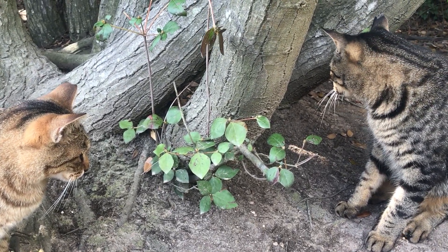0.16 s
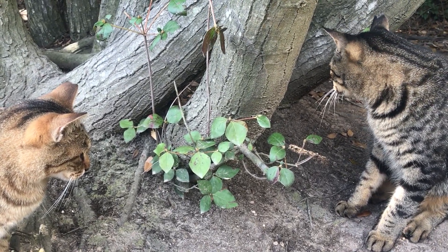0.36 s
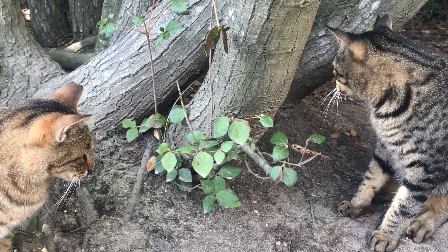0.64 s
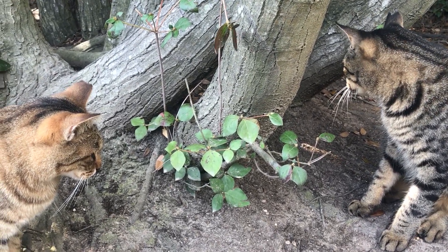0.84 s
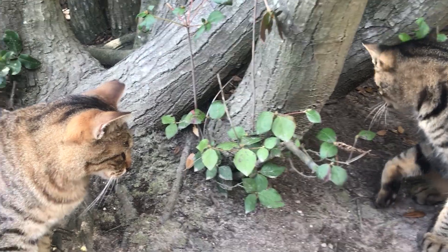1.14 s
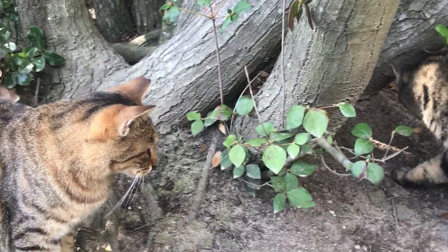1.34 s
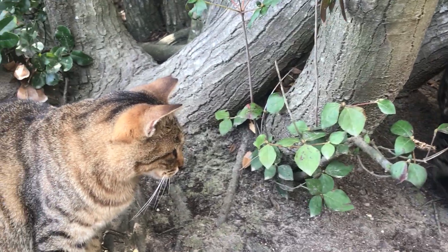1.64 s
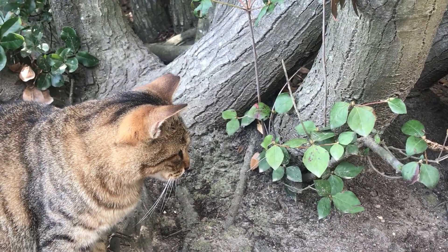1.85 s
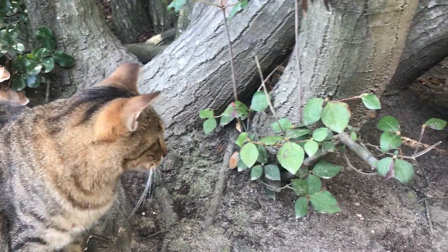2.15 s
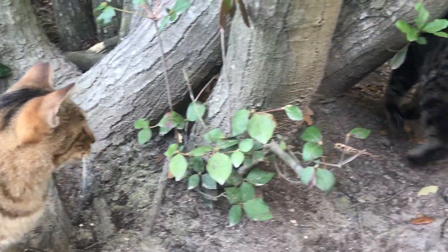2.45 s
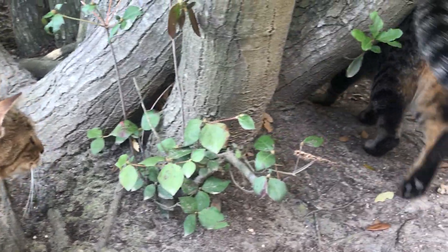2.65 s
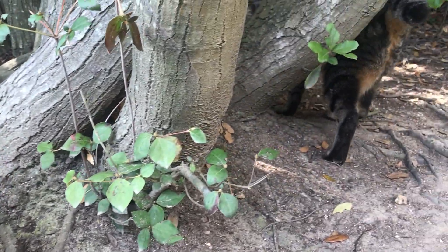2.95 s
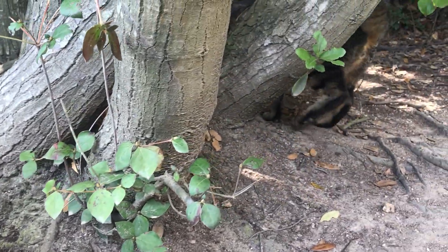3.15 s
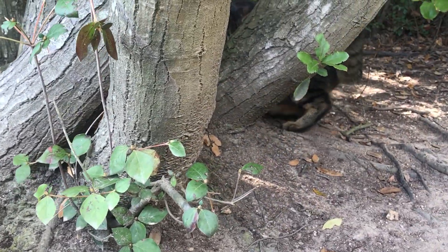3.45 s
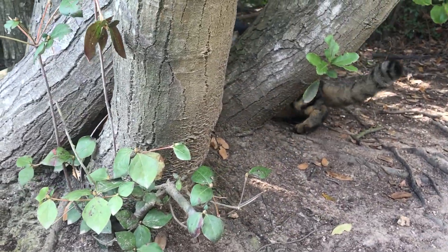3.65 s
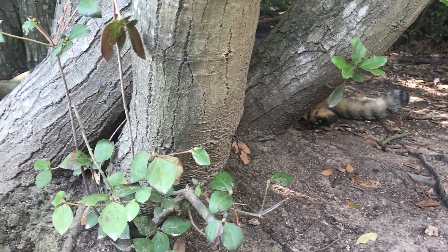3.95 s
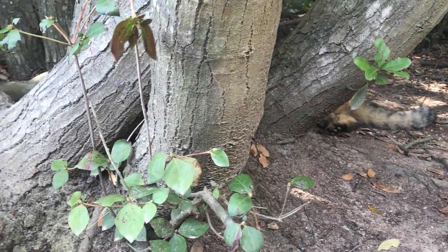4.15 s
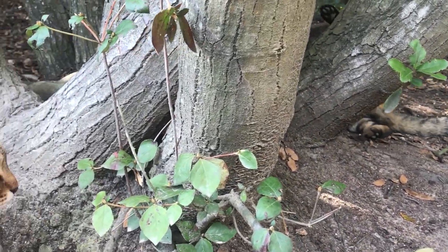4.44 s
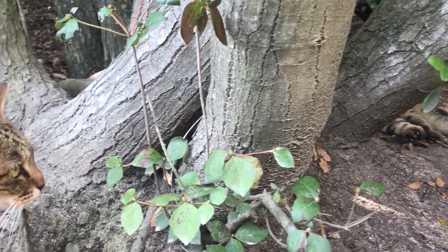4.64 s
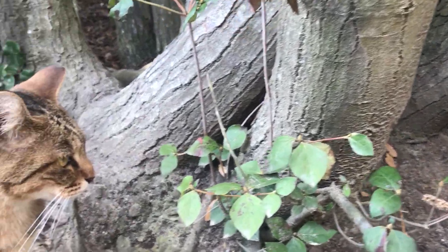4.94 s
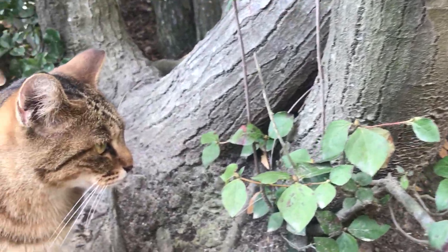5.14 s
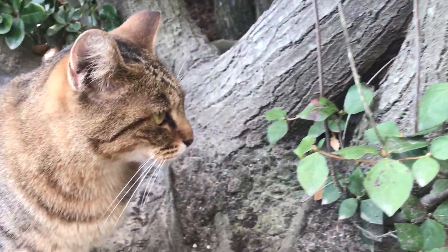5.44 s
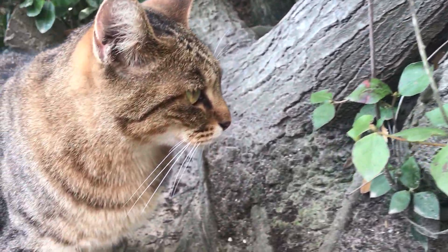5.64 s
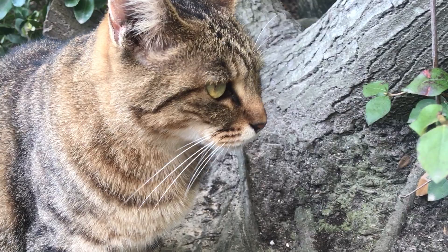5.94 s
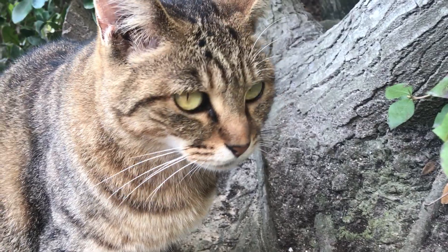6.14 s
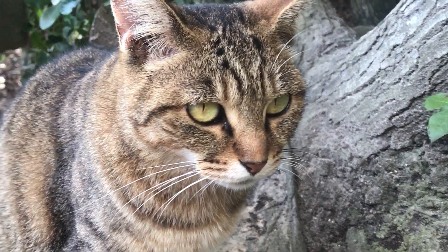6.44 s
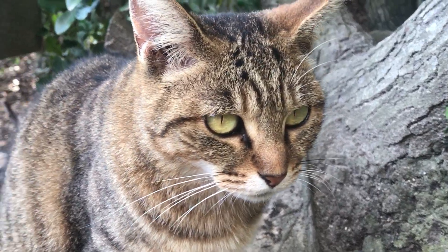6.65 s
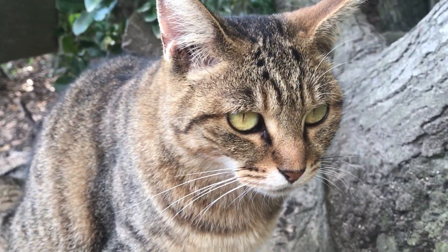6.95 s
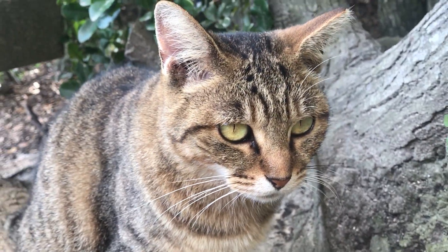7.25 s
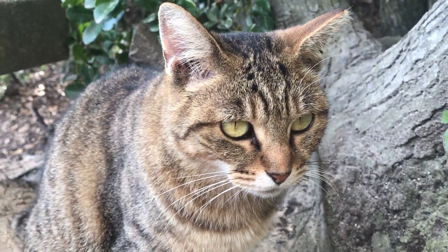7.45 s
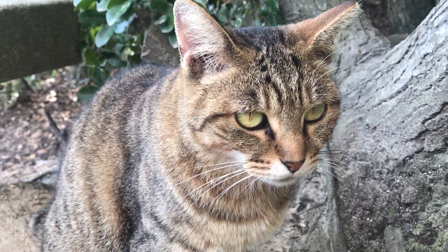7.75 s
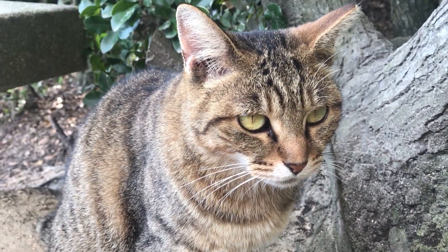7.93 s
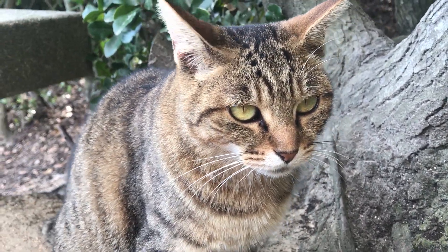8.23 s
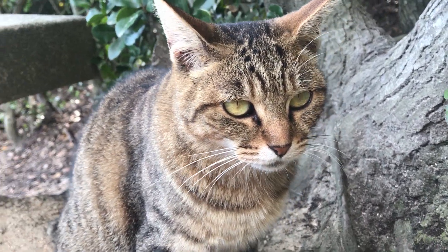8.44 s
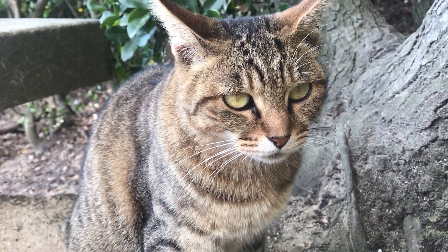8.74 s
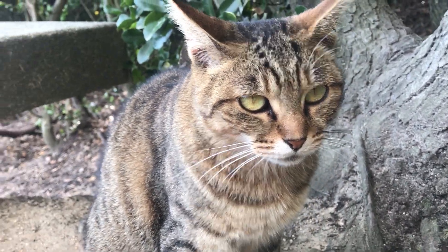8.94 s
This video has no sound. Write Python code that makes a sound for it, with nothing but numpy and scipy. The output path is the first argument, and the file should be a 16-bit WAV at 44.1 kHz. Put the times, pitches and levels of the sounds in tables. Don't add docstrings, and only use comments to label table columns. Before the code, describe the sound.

A quiet wooded place, recorded with an exposed microphone: steady, very high insect rasping in short rapid strokes, blurred by echoes off trunks, with faint distant chirping behind. Early on, purer cricket trills come in three bursts. Soft low wind bumps, strongest around five and a half seconds, and sparse dry leaf ticks follow. At the very end everything breaks off into close scraping and loud hollow wood knocks.

```python
import sys
import numpy as np
from scipy import signal
from scipy.fft import rfft, irfft, next_fast_len
from scipy.io import wavfile

SR = 44100
rng = np.random.default_rng(int(sys.argv[2]) if len(sys.argv) > 2 else 0)


def elevation(decibels):
    levels = np.asarray(decibels, float)
    return 10 ** (levels / 20)


def transcribe(u):
    v = np.clip(np.atleast_2d(u).T, -1, 1)
    q = np.round(v * 32767).astype(np.int16)
    wavfile.write(sys.argv[1], SR, q)


N = 400849
TIME = np.arange(N) / SR
CUT_S = 8.852

# time_s, level_db
BREEZE_LEVEL = [(0.0, -58), (0.81, -60), (1.43, -52), (1.82, -60.5), (2.27, -51.5), (2.41, -59), (3.3, -62),
                (4.24, -61.5), (4.56, -53), (5.0, -60), (5.49, -48.5), (5.77, -56.5), (6.16, -50.5),
                (6.46, -59.5), (6.66, -63), (7.44, -55.5), (8.48, -57), (8.85, -63.5)]


def evened(x):
    return x / np.sqrt(np.mean(x ** 2) + 1e-20)


def coloured(x, points):
    size = next_fast_len(len(x))
    point_hz, point_db = np.transpose(points)
    hz = np.fft.rfftfreq(size, 1 / SR)
    gain = elevation(np.interp(np.log(hz + 1), np.log(point_hz + 1), point_db))
    return irfft(rfft(x, size) * gain, size)[:len(x)]


def coloured_noise(points):
    return evened(coloured(rng.standard_normal(N), points))


def add(mix, s, sound):
    at = round(s * SR)
    sound = sound[max(-at, 0):]
    part = mix[max(at, 0):][:len(sound)]
    part += sound[:len(part)]


def wander(hz):
    lowpass = signal.butter(2, hz, fs=SR, output="sos")
    return evened(signal.sosfilt(lowpass, rng.standard_normal(N)))


def scatter(x, t60, gap_s):
    t = np.arange(SR // 3) / SR
    taps = rng.standard_normal(len(t)) * (rng.random(len(t)) < .1)
    tail = taps * elevation(-60 * t / t60) * (1 - np.exp(-t / gap_s))
    return signal.oaconvolve(x, tail / np.linalg.norm(tail))[:len(x)]


def echoes(x, t60, wet_db, gap_s):
    return x + elevation(wet_db) * scatter(x, t60, gap_s)


def glide(hz, drop_hz, length_s):
    t = np.arange(-1.5 * length_s, 1.5 * length_s, 1 / SR)
    shape = np.exp(-(2 * t / length_s) ** 2)
    turns = hz * t - drop_hz * t ** 2 / (2 * length_s)
    return shape * np.sin(2 * np.pi * turns + 2 * np.pi * rng.random())


def strokes(stroke_s):
    # time_s, strokes_so_far
    tempo = [(-.085, 0), (1.4022, 8), (1.77, 10), (2.3115, 13), (3.0435, 17), (3.2275, 18), (3.5901, 20),
             (4.3302, 24), (4.4975, 25), (4.8581, 27), (5.3954, 30), (5.5839, 31), (6.1364, 34),
             (6.3167, 35), (6.8679, 38), (7.0474, 39), (7.4168, 41), (7.7794, 43), (8.6959, 48)]
    # from_s, to_s
    slow_spells = [
        (.2, .55),
        (.75, 1.1),
        (1.7, 2.0),
        (2.4, 4.4),
    ]
    fast_teeth_per_s, slow_teeth_per_s = 335, 303
    stumble_s, stumble_db = 4.146, -2.5
    marks_s, made = np.transpose(tempo)
    starts_s = np.interp(np.arange(made[-1] + 1), made, marks_s)
    slow = np.any([(starts_s > a) & (starts_s < b) for a, b in slow_spells], axis=0)
    db = 0.45 * rng.standard_normal(len(starts_s))
    db += stumble_db * (abs(starts_s - stumble_s) < stroke_s)
    return zip(starts_s, db, np.where(slow, slow_teeth_per_s, fast_teeth_per_s))


def bush_cricket():
    # pitch_hz, level_db, t60_s
    membrane = [
        (9700, -9, .003),
        (11000, -1.5, .0045),
        (12500, 0, .0045),
        (13600, -8, .003),
    ]
    # frequency_hz, density_db (per Hz)
    rasp_tone = [(4710, -51), (8000, -26), (8950, -13), (9310, -8.5), (9650, 0), (10300, -3), (11200, 0.5),
                 (12400, 0), (13400, -.5), (15600, -23.5)]
    stroke_s = 0.063
    lead, t = SR // 5, np.arange(300) / SR
    clicks = np.zeros(N + lead)
    for s, db, teeth_per_s in strokes(stroke_s):
        tooth_s = np.arange(0, stroke_s, 1 / teeth_per_s)
        late, uneven = rng.standard_normal((2, len(tooth_s)))
        force_db = db + 1.5 * uneven - 1.2 * (1 - tooth_s / stroke_s) ** 2
        at = np.round((s + tooth_s + .0001 * late) * SR).astype(int) + lead
        clicks[at] = elevation(force_db)
    ring = sum(elevation(db - 60 * t / t60) * np.sin(2 * np.pi * hz * t) for hz, db, t60 in membrane)
    ring = ring * (1 - np.exp(-t * SR / 9)) ** 2
    direct = signal.oaconvolve(clicks, ring)[lead:lead + N]
    turn = 2 * np.pi * 0.6 * np.arange(N + lead) / SR
    wet = sum(scatter(clicks, 0.21, gap_s=250 / SR) * np.cos(turn + k * np.pi / 3) for k in range(3))
    wet = coloured(wet, rasp_tone)[lead:]
    return elevation(-66.3) * evened(direct) + elevation(-63.3) * evened(wet)


def field_cricket():
    # first_pulse_s, last_pulse_s, pulses_per_s, final_db, echo_db
    trills = [
        (-.4895, .07, 43.2, -56, -6.5),
        (.442, 1.003, 46.15, -60, -6.5),
        (1.194, 1.775, 45.3, -60.5, -1),
    ]
    start_hz, end_hz, swell_db = 5040, 5185, 5.5
    pulse_s, pulse_growth_s = .012, .0045
    settle_hz, settle_s = 470, .006
    out = np.zeros(N)
    for first, last, rate, final_db, echo_db in trills:
        trill = np.zeros(2 * SR)
        for s in np.arange(0, last - first, 1 / rate):
            warm = 1 - (1 - s / (last - first)) ** 2
            t = np.arange(0, pulse_s + warm * pulse_growth_s, 1 / SR)
            shape = signal.windows.tukey(len(t), .6) * (0.75 + 0.3 * t / t[-1])
            fall = settle_hz * settle_s * (1 - np.exp(-t / settle_s))
            hz = start_hz + warm * (end_hz - start_hz) - 130
            pulse = shape * np.sin(2 * np.pi * (hz * t + fall + rng.random()))
            db = final_db - (1 - warm) * swell_db + .8 * rng.standard_normal()
            if s == 0:
                db -= 4
            add(trill, s, elevation(db) * pulse)
        add(out, first - .008, echoes(trill, 0.2, echo_db, gap_s=0.0049))
    return elevation(2.0) * out


def chirps():
    # first_s, last_s, gap_s, peak_db, pitch_hz
    bouts = [(.04, 1.349, .33, -71.5, 7070), (1.72, 2.072, .35, -71.3, 7060),
             (3.176, 3.732, .28, -71.5, 7030), (4.034, 5.186, .29, -72, 7025),
             (6.24, 6.879, .32, -71.5, 7000), (7.195, 8.512, .33, -74, 7050),
             (0.338, 1.016, .34, -74, 6380), (1.366, 2.07, .35, -73, 6370), (8.14, 8.524, .38, -76, 6430),
             (2.273, 3.344, .36, -73.5, 6630), (4.06, 4.757, .35, -70, 6690),
             (5.142, 5.142, .36, -70, 6600), (5.505, 6.257, .37, -64.5, 6700), (.114, .457, .34, -75, 6460),
             (.86, 1.502, .32, -74.5, 6610), (.562, 1.233, .33, -76, 6900), (3.133, 3.786, .33, -75, 6710),
             (4.473, 4.96, .49, -76, 6750), (6.523, 6.876, .35, -75.4, 6745), (7.63, 7.968, .34, -76, 6775),
             (1.99, 1.99, .35, -76, 6450)]
    rows = []
    for first, last, gap, db, hz in bouts:
        times = np.linspace(first, last, round((last - first) / gap) + 1)
        for s, (u, v) in zip(times, rng.standard_normal((len(times), 2))):
            rows.append((s, db + 1.2 * u, hz + 25 * v))
    return rows


def far_crickets():
    faint_count, faint_db, faint_hz, spread_hz = 500, -89, 6800, 330
    faint = rng.random((faint_count, 3)) * [N / SR, 6.5, 2 * spread_hz]
    faint += [0, faint_db, faint_hz - spread_hz]
    out = np.zeros(N)
    for s, db, hz in [*chirps(), *faint]:
        drop_hz = 220 * (.5 + rng.random())
        length_s = .018 * (.7 + .6 * rng.random())
        chirp = glide(hz, drop_hz, length_s)
        add(out, s - len(chirp) / 2 / SR, elevation(db) * chirp)
    return elevation(4.0) * echoes(out, 0.17, -5.0, gap_s=300 / SR)


def eddies():
    # centre_s, peak_db, pitch_hz, wake_s
    leaders = [(.979, -41, 189, 0.00037), (1.198, -40.5, 143, 0.0013), (1.272, -40, 125, .05),
               (1.395, -42, 242, 0), (1.513, -50, 247, .06), (1.605, -41, 170, .08), (2.18, -41, 175, .055),
               (2.342, -49.5, 245, .03), (2.693, -47.5, 163, .03), (3.167, -41.5, 228, .06),
               (3.826, -43, 170, 0), (4.223, -38.5, 101, 0), (4.333, -42.5, 201, .13),
               (4.556, -43, 190, .1), (4.691, -45, 238, .03), (4.854, -45.5, 145, 0), (5.111, -47, 148, .2),
               (5.361, -42, 114, 0), (5.461, -35, 186, 0.00045), (5.473, -33, 282, 0),
               (5.542, -35, 221, 0.00039), (5.555, -29, 134, 0), (5.634, -45, 243, .03),
               (5.67, -36, 79, .03), (5.883, -42.5, 243, .13), (6.173, -43, 200, .09), (6.377, -43, 145, 0),
               (6.616, -42.5, 150, .03), (7.604, -42, 200, .11), (8.481, -44.5, 212, 0)]
    gap_s, wake_db, spread_db = .021, -4.5, 2.0
    whirl_hz, spread_oct = 140, 0.46
    stray_count, stray_db = 45, 4
    rows = []
    for s, db, hz, wake_s in leaders:
        rows.append((s, db, hz))
        late = np.arange(gap_s, wake_s + 1e-3, gap_s)
        for after, (u, v, w) in zip(late, np.clip(rng.standard_normal((len(late), 3)), -2, 2)):
            whirl_db = db + wake_db + spread_db * v
            rows.append((s + after + gap_s * u / 4, whirl_db, whirl_hz * 2 ** (spread_oct * w)))
    s = (np.arange(stray_count) + rng.random(stray_count)) * CUT_S / stray_count
    v, w = np.clip(rng.standard_normal((2, stray_count)), -2, 2)
    db = np.interp(s, *np.transpose(BREEZE_LEVEL)) + stray_db + spread_db * v
    return rows + list(zip(s, db, whirl_hz * 2 ** (spread_oct * w)))


def wind():
    # frequency_hz, density_db (per Hz)
    rumble_tone = [(15, -30), (30, -5.5), (60, 3), (120, -8), (250, -20), (500, -45.5), (1000, -78.5)]
    # frequency_hz, density_db (per Hz)
    fizz_tone = [(60, -2.5), (150, 5), (250, 3.5), (400, -8), (700, -23), (1200, -53)]
    breeze_db = np.interp(TIME, *np.transpose(BREEZE_LEVEL))
    rumble = elevation(breeze_db + 2.63 * wander(9.7) + 0.6) * coloured_noise(rumble_tone)
    thumps, stir = np.zeros(N), np.zeros(N)
    for s, db, hz in eddies():
        push = glide(0.7 * hz, 0.46 * hz, 0.97 / hz + 0.0012)
        add(thumps, s - len(push) / 2 / SR, elevation(db + 6.0) * push)
        fizz_db = db + 6.3 * np.log2(hz / 120)
        add(stir, s - .028, elevation(fizz_db) * np.hanning(2200) ** 2)
    return rumble + thumps + elevation(-15.0) * stir * coloured_noise(fizz_tone)


def hum():
    # frequency_hz, density_db (per Hz)
    low_tone = [(90, -23.5), (150, 0), (340, -13), (450, -11.5), (900, -18), (1100, -22.5), (2000, -40),
                (5000, -82)]
    # frequency_hz, density_db (per Hz)
    high_tone = [(600, -32), (1000, -4.5), (1400, -1), (2200, -14), (3500, -28)]
    # time_s, level_db, brightness_db
    swells = [(0, -76.5, -24), (.8, -76.5, -27), (1.1, -75, -24), (3, -73.5, -18), (3.7, -68.5, -24),
              (4.1, -73, -16), (5.8, -74, -15), (6.3, -77.5, -21), (6.8, -74.5, -13), (7.3, -77, -20),
              (7.8, -74.5, -7.5), (8.6, -76.5, 0.5), (8.85, -71.5, 3.5)]
    s, hum_db, bright_db = np.transpose(swells)
    low = elevation(5.0) * coloured_noise(low_tone)
    high = elevation(np.interp(TIME, s, bright_db) - 4.0) * coloured_noise(high_tone)
    return elevation(np.interp(TIME, s, hum_db) + 2.3 * wander(17.4)) * (low + high)


def leaves():
    # start_s, peak_db, centre_hz, width_hz, t60_s
    ticks = [(-.002, -52, 2430, 3000, 0.041), (1.4064, -56, 2000, 2500, 0.0097),
             (2.235, -59.5, 2200, 4000, 0.066), (2.9494, -62.5, 2290, 1500, 0.022),
             (3.4984, -53, 4500, 6000, 0.019), (3.504, -63, 4000, 5000, .08),
             (3.7758, -53, 5450, 4000, .02), (3.83, -63.5, 4500, 5000, 0.76),
             (3.962, -63, 3500, 1500, .015), (3.9823, -53.5, 1260, 1200, .015),
             (4.5052, -59, 2540, 600, .02), (4.6394, -63, 5640, 900, 0.033), (4.7815, -62, 1100, 600, .02),
             (5.8894, -67, 1280, 1200, 0.03), (6.786, -56, 840, 600, .02), (6.8, -66, 2300, 900, .12),
             (6.858, -60, 900, 900, 0.16), (6.862, -64.5, 3200, 2600, 0.14)]
    out, t = np.zeros(N), np.arange(9000) / SR
    for s, db, hz, width_hz, t60 in ticks:
        decay = elevation(-60 * t / t60) + elevation(-15 - 12 * t / t60)
        snap = rng.standard_normal(len(t)) * decay * (1 - np.exp(-30 * t / t60))
        band = signal.iirpeak(hz, hz / width_hz, SR)
        snap = signal.lfilter(*band, signal.lfilter(*band, snap))
        snap = snap * np.hanning(2 * len(t))[len(t):]
        add(out, s, elevation(db) * snap / abs(snap).max())
    return out


def air():
    # frequency_hz, density_db (per Hz)
    hiss_tone = [(300, -18.5), (900, -5), (1600, -4.5), (2400, -5), (2900, -7), (5000, -8), (7800, -11),
                 (12000, -3), (15700, -12.5)]
    return elevation(-73 + 0.92 * wander(25)) * coloured_noise([(100, -46), *hiss_tone])


def scrape():
    # time_s, level_db
    strength = [
        (8.842, -95),
        (8.853, -54),
        (8.885, -50),
        (8.92, -46),
        (8.96, -46),
        (9.03, -52),
        (9.06, -50),
        (9.07, -64),
        (9.09, -60),
    ]
    # frequency_hz, density_db (per Hz)
    wood_tone = [(30, -25), (60, 6), (260, -14.5), (520, -4), (620, -7.5), (760, -2.5), (1000, -22),
                 (1300, -14.5), (1700, -20.5), (2250, -14.5), (2650, -21), (3000, -25.5), (3800, -32.5),
                 (9000, -67)]
    jerks = (rng.random(N) < 650 / SR) * elevation(4.2 * np.minimum(rng.exponential(1, N), 3))
    slips = jerks * rng.choice([-1, 1], N)
    grit = evened(slips) + 0.54 * rng.standard_normal(N)
    level = elevation(np.interp(TIME, *np.transpose(strength), left=-120))
    return level * evened(coloured(grit, wood_tone))


def hollow_body():
    # start_s, blow_db, hardness_db (per octave)
    knocks = [(8.862, -29.5, 4.6), (8.91, -47, -1), (8.917, -41, 3), (8.935, -40, 1), (8.957, -32, -1.5),
              (8.97, -40, 2), (8.982, -28.5, 4.5), (8.996, -17, -1.8), (9.003, -25, -0.5),
              (9.0296, -11.5, 0.6), (9.049, -36.5, 1), (9.062, -41.5, -3)]
    # pitch_hz, level_db, t60_s, build_up_s
    modes = [(71, -9.5, 0.1, 0.0041), (159, -2.5, 0.031, 0.0025), (313, 1.5, 0.03, 0.0014),
             (485, 1.5, 0.042, 0.0043), (804, -4.5, 0.023, 0.0007), (936, -23.5, 0.13, .004),
             (1283, -1, 0.013, 0.00057), (1526, -9, 0.0091, 0.00029), (2227, -13, 0.014, 0.00032),
             (2890, -17, 0.014, 0.00026), (3740, -21, 0.0066, 0.00016), (5300, -39, .006, .0002),
             (6800, -43, 0.006, .0002)]
    out, t = np.zeros(N), np.arange(SR // 5) / SR
    for s, blow_db, hard_db in knocks:
        ring = np.zeros(len(t))
        for hz, mode_db, t60, rise_s in modes:
            spot_db = 1.2 * rng.standard_normal()
            db = mode_db + hard_db * np.log2(hz / 800) + spot_db
            swell = (1 - np.exp(-t / rise_s)) ** 2
            ring += elevation(db - 60 * t / t60) * swell * np.sin(2 * np.pi * hz * t)
        bend = np.sin(2 * np.pi * 0.01436 / (t + 0.001757)) * (t / 0.0019) ** 2 * np.exp(-t / .0016)
        add(out, s, elevation(blow_db) * (ring + elevation(0.5) * bend))
    return out


def scene():
    outdoors = bush_cricket() + field_cricket() + far_crickets() + wind() + hum() + leaves()
    fade = np.clip((CUT_S - TIME) / .006 + .5, 0, 1)
    hiss = (0.68 + 0.44 * fade) * air()
    return (fade * outdoors + hiss + scrape() + hollow_body())[None]


def roll_off(x):
    return signal.sosfilt(signal.butter(12, 15780, fs=SR, output="sos"), x)


def record(dry):
    bass_cut = signal.butter(2, 30, "highpass", fs=SR, output="sos")
    return roll_off(signal.sosfilt(bass_cut, dry))


dry = scene()
out = record(dry)
transcribe(out)
```